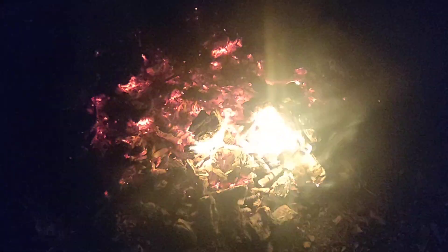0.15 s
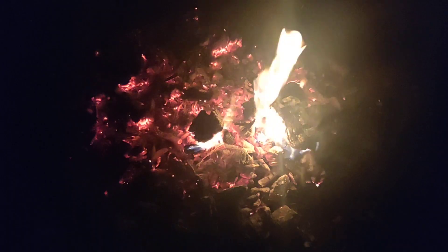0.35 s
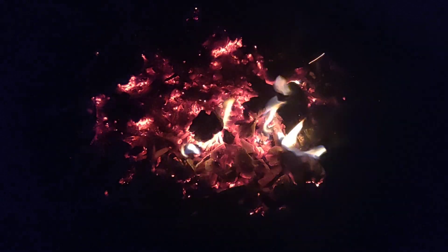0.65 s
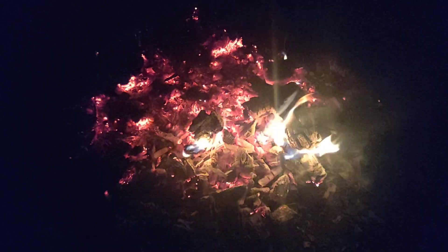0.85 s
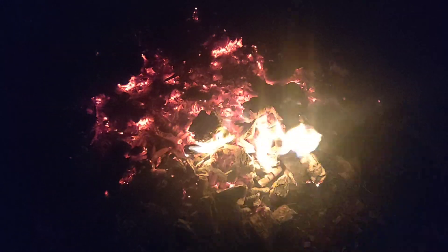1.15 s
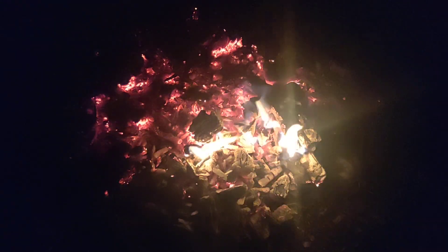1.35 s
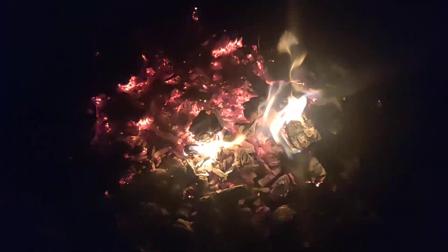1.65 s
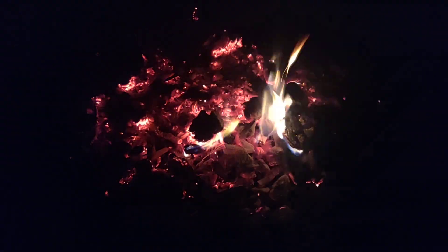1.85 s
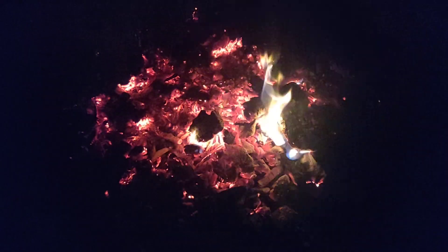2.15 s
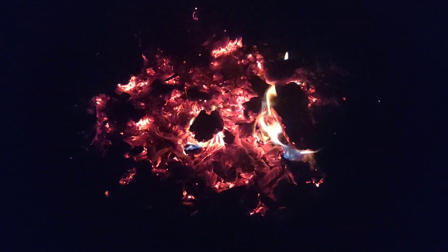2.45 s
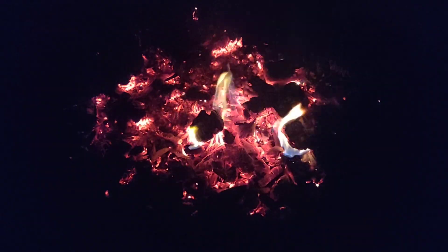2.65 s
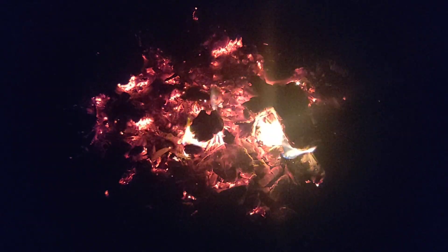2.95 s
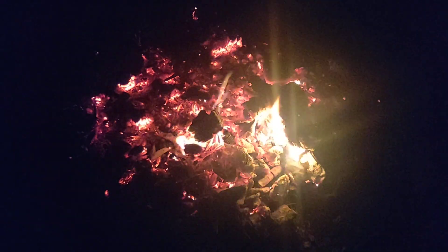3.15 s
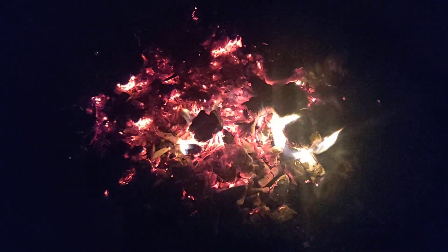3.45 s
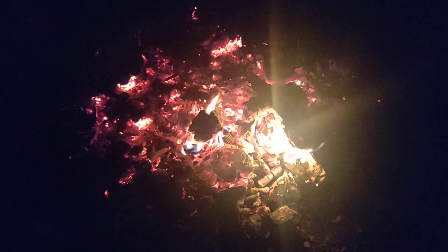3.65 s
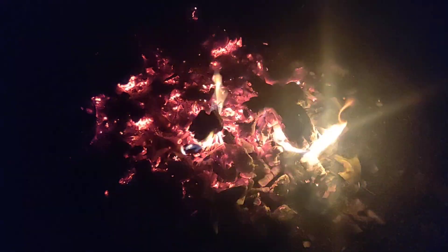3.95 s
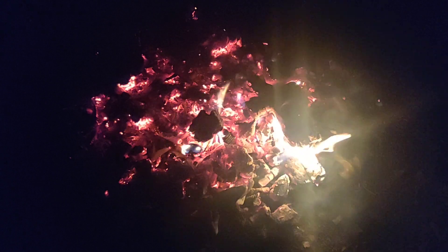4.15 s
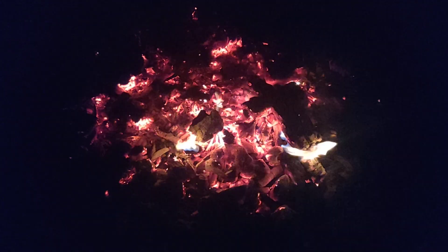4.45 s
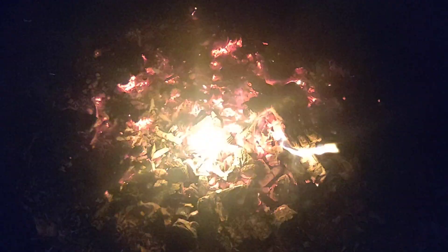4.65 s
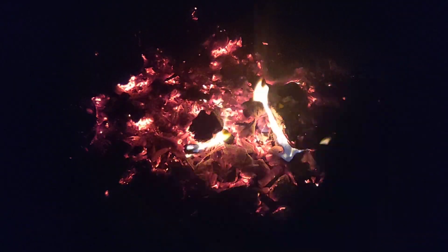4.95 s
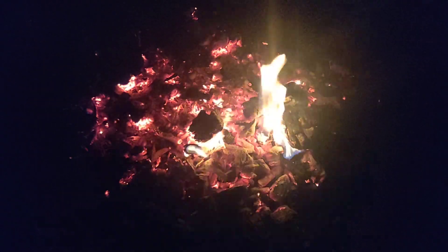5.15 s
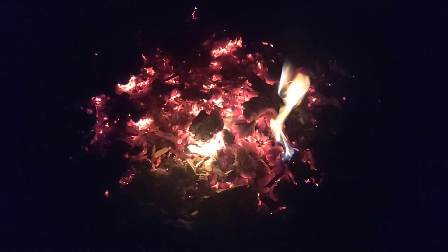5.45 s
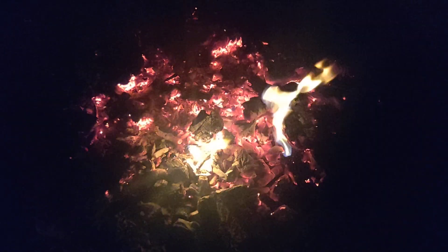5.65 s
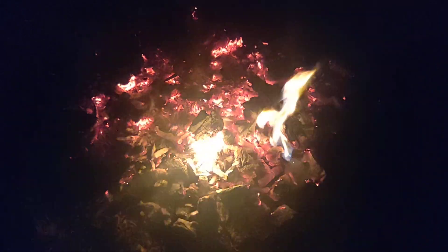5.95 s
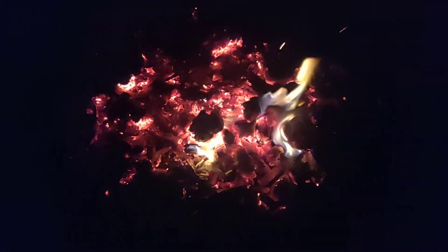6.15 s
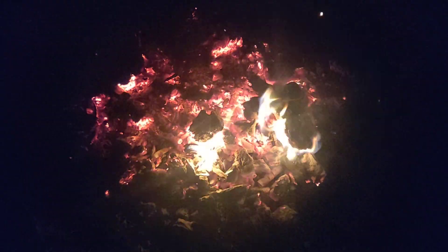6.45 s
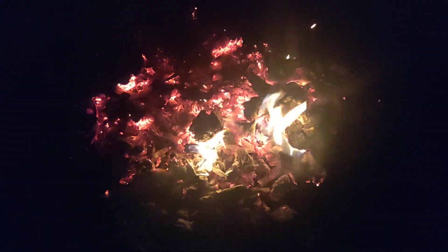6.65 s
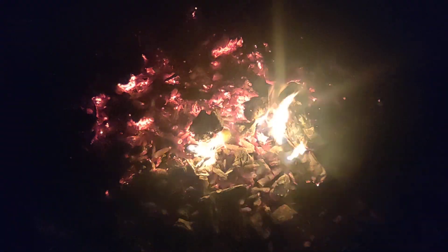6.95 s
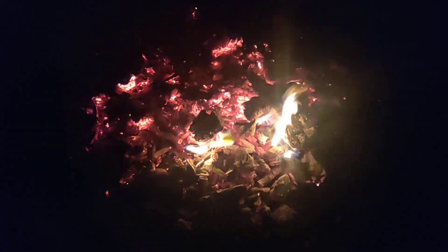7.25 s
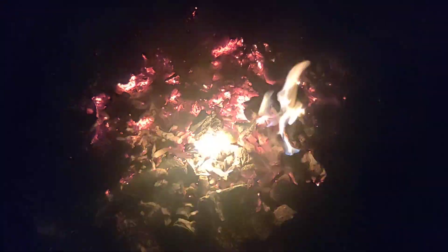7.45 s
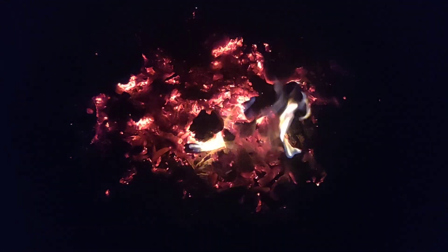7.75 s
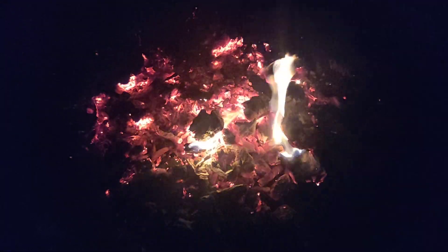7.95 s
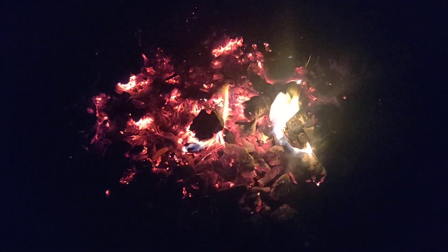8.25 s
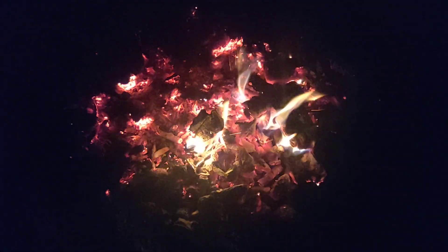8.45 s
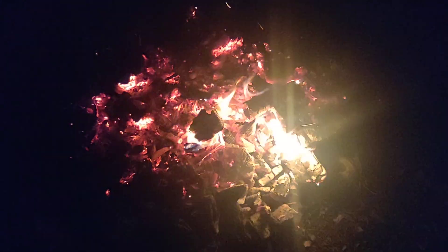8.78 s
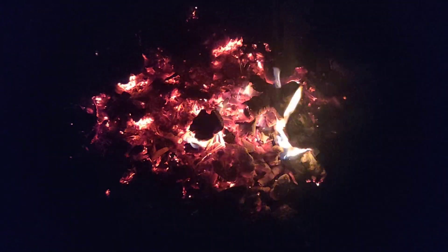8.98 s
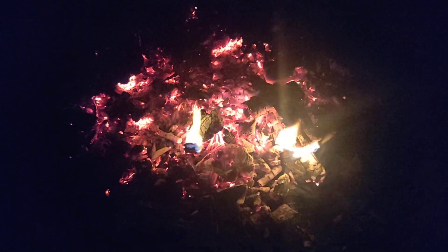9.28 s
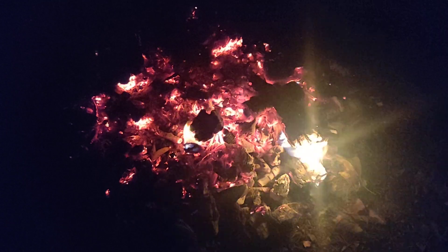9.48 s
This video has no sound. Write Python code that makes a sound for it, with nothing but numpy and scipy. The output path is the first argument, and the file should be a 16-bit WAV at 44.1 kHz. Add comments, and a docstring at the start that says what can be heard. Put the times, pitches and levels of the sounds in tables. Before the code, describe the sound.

Dry charcoal pops and soft fire rumble outdoors at night, then a bright cricket chirps rapidly nearby as far crickets trill and an engine drones faintly.

```python
"""Embers and crickets at night

A bed of embers ticks and pops close by: noise bursts through resonances, over a rumble of small flames.
Halfway through, a cricket starts chirping nearby, each wing stroke a downward-sliding tone with a faint rasp.
Other crickets trill further off, in a faint insect chorus made of pulsing tones and shaped noise.
A distant engine drones, a wavering note inside a low roar; later it comes and goes in level and sinks in pitch.
"""
import sys
import numpy as np
from scipy import signal
from scipy.fft import rfft, irfft, next_fast_len
from scipy.io import wavfile
from scipy.ndimage import uniform_filter1d, minimum_filter1d, map_coordinates

SR = 44100
rng = np.random.default_rng(int(sys.argv[2]) if len(sys.argv) > 2 else 0)


def unload_audio(sound):
    """Save the sound as a 16-bit wav file, at the path given as the first command line argument."""
    columns = np.transpose(np.atleast_2d(sound))
    # keep every value between -1 and 1, then stretch to whole-number steps
    steps = np.round(np.clip(columns, -1, 1) * 32767)
    wavfile.write(sys.argv[1], SR, steps.astype(np.int16))


N = 424241

# Flame rumble spectrum. Each row: frequency in Hz, relative level in dB per Hz.
FLAME_SPECTRUM = [(12, -33), (20, -1.5), (48, -0.5), (103, 0), (116, -1.5), (135, -8), (172, -12.5),
                  (243, -14), (321, -20.5), (356, -24), (420, -36), (550, -63), (920, -120)]
# Night air spectrum. Each row: frequency in Hz, relative level in dB per Hz.
AIR_SPECTRUM = [(250, 0), (420, -3), (600, 0.5), (950, -0.5), (1250, -8.5), (2000, -12), (2700, -12.5),
                (4500, -9.5), (5500, -13), (6700, -7.5), (8200, -19), (10000, -25.5), (15500, -21)]
# Blended insect spectrum. Each row: frequency in Hz, relative level in dB per Hz.
CHORUS_SPECTRUM = [(2500, -21), (3000, -5.5), (3300, 1.5), (3520, 0), (3800, -5.5), (4400, -8.5),
                   (5200, -56)]
# Engine roar spectrum. Each row: frequency in Hz, relative level in dB per Hz.
ROAR_SPECTRUM = [(50, -21.5), (80, 11.5), (125, -12), (175, -1.5), (220, 6), (310, -0.5), (400, -16),
                 (700, -49)]
# Stereo width of the noise beds. Each row: frequency in Hz, left-right correlation from -1 to 1.
STEREO_LIKENESS = [(60, 0.94), (130, 0.99), (290, 0.76), (640, 0.54), (1410, -0.18), (3100, 0.034),
                   (15000, -0.018)]
# Partials of the exhaust note. Each row: multiple of the note, level in dB before it wavers.
EXHAUST_ORDERS = [(.7, -8.5), (0.999, -1.5), (1.25, -14), (1.78, -21)]
# Engine loudness once it is within earshot. Each row: time in seconds, level in dB.
ENGINE_LEVEL_CURVE = [(4.5, -83), (5.01, -49.5), (5.35, -67), (6.27, -51), (6.95, -58), (7.94, -47.5),
                      (8.16, -57), (8.62, -44.5), (9.62, -45)]
# Far cricket trills. Each row: centre of first pulse in seconds, pulses, seconds between pulses,
# pitch in Hz before random detune, level in dB before random variation.
FAR_TRILLS = [(.012, 12, .044, 3120, -54.5), (2.2, 11, .05, 3490, -53), (4.35, 8, 0.045, 3690, -58),
              (8.226, 1, .052, 3550, -40), (8.39, 6, .0522, 3597, -38), (8.808, 4, 0.056, 3540, -42.5)]
# Loudness through one wing stroke, with a small catch at its end. Each row: share of the stroke, gain.
STROKE_SHAPE = [(0, 0.14), (.06, 0.33), (.18, 0.77), (.36, 0.78), (.58, 0.85), (.76, 0.35), (.87, 0.33),
                (.96, 0.2), (1, 0.031)]
# Louder bursting embers. Each row: start in seconds, level in dB (all the energy as rms over 10 ms),
# snap centre in Hz, low knock gain in dB, scatter tail gain in dB, left minus right level in dB.
LOUD_POPS = [(.3544, -28.5, 5570, -8, -6.5, -1), (0.4698, -48.5, 5340, -8, 16, 1),
             (0.9092, -34, 3460, 3.5, -2, 3), (1.063, -40, 4480, -24, 12, 3),
             (1.0832, -40, 4770, -26, 4, 1), (1.1092, -43, 4000, -28, -2, 3),
             (1.155, -28, 4550, -35, -10, 2.5), (1.355, -36.5, 5600, -15, 18, 1.5),
             (2.276, -48, 6200, -8, -1, 1), (2.4406, -47, 4370, -6, -12, 2),
             (2.6062, -45, 4750, -12, 14, 8), (3.0366, -44.5, 7200, -31, -19, 15),
             (3.108, -24.5, 3100, -10, -12, 3.5), (3.6762, -31.5, 5350, -8, 1.5, 6),
             (3.8453, -41, 4650, -1, -8, 0), (4.085, -46.5, 3600, 10, 3, 6),
             (4.1879, -34.5, 4260, -8, -10, 3), (4.9831, -43, 4930, -27, 7, 4),
             (5.7008, -36, 4300, 4.5, -8, 5), (6.0168, -44, 3200, -3, -6, 3),
             (7.1605, -48.5, 5900, -18, -3, 2), (7.2019, -48.5, 4530, -7, -3, 8.5),
             (7.5157, -41.5, 5540, -3, 9, 1), (7.7187, -17, 3560, -4.5, 1.5, 2),
             (8.308, -46.5, 5700, -5, 4, 9.5), (8.6014, -42, 4300, -18, 6, -2),
             (8.7041, -17, 4900, -8.5, -6.5, 2.5), (9.0752, -40, 5040, -15, -17, 12.5),
             (9.3525, -12.5, 4600, -6.5, -13.5, 1.5), (9.4875, -46.5, 3760, -10, -18, 5)]
# Colour shared by all pops. Each row: frequency in Hz, gain in dB.
EMBER_COLOUR = [(200, -37), (400, -9), (520, 0), (750, -6), (1100, 0.5), (1800, -0.5), (3200, 4.5),
                (4400, 1.5), (5400, -2), (6700, 3), (8600, -1.5), (10000, -15), (16000, -13.5)]
# Near cricket chirps. Each row: approximate time of first stroke in seconds, strokes.
NEAR_CHIRPS = [(4.665, 8), (5.045, 8), (5.407, 8), (5.773, 8), (6.139, 8), (6.528, 8), (6.892, 8),
               (7.272, 7), (7.638, 8), (8.027, 8), (8.437, 8), (8.854, 7), (9.245, 7)]

FLAME_DB, FLAME_GROWTH_DB_PER_S = -44, 0.26  # starting level; the flames slowly gain strength
AIR_DB, AIR_GROWTH_DB_PER_S = -57, 0.2224  # starting level; the air slowly rises too
CHORUS_DB = -59.5  # blended distant insects
ENGINE_HZ, ENGINE_SAG_HZ_PER_S = 282.8, 8.1  # starting note, and its sinking after arrival
ENGINE_ARRIVES_S, ENGINE_FAR_DB = 4.5, -69  # held at the far level until it arrives
BUSY_FROM_S, BUSY_UNTIL_S = 2.25, 4.55  # the coals crackle more busily between these times
STROKE_PERIOD_S, SONG_HZ, SONG_DB = .0269, 2999, -21.5  # the near cricket in full song
WARM_UP_S, COLD_DB, COLD_HZ = 1.7, 4.5, 50  # it starts this much softer and lower, and warms up
FIRST_STROKE_DB, HESITANT_DB = 4, 13  # each chirp opens weaker; the very first one weaker still
TOP_HZ = 16000  # upper band limit


def amp(db):
    """Decibels to gain."""
    return 10 ** (np.asarray(db) / 20)


def unit(x):
    """Scale to rms 1."""
    return x / np.sqrt(np.mean(x ** 2) + 1e-20)


def along(points, hz):
    """Read (Hz, value) points on a log frequency axis."""
    f, v = np.transpose(points)
    return np.interp(np.log(hz + 1), np.log(f + 1), v)


def curves(rows):
    """One value per sample for each column after the time."""
    s, *cols = np.transpose(rows)
    return [np.interp(np.arange(N) / SR, s, c) for c in cols]


def wobble(rate):
    """A smooth random curve with rate knots a second."""
    knots = rng.standard_normal(int(N * rate / SR) + 4)
    steps = np.linspace(0, N, len(knots) * 10)
    return np.interp(np.arange(N), steps, map_coordinates(knots, [steps * rate / SR]))


def filtered(x, response):
    """Shape x with a complex response of frequency."""
    n = x.shape[-1]
    m = next_fast_len(n + 4096)  # padding leaves room for ringing
    return irfft(rfft(x, m) * response(np.fft.rfftfreq(m, 1 / SR)), m)[..., :n]


def causal(gain):
    """The minimum-phase response of this gain, which rings only after it is struck."""
    cepstrum = irfft(np.log(np.maximum(gain, 1e-6)))
    half = len(cepstrum) // 2
    return np.exp(rfft(np.r_[cepstrum[0], 2 * cepstrum[1:half], np.zeros(half)]))


def resonance(hz, centre, q):
    """Gain of one resonance, 1 at its centre."""
    return 1 / np.sqrt(1 + (q * ((hz + 1) / centre - centre / (hz + 1))) ** 2)


def delay(hz, left_s, right_s):
    """Stereo phase response that delays each side by its own time."""
    return np.exp(-2j * np.pi * hz * np.array([[left_s], [right_s]]))


def pan(db):
    """Left and right gains for a left minus right level difference."""
    return amp([[db / 2], [-db / 2]])


def add(track, s, sound):
    """Mix a sound into a track from time s."""
    i = int(np.clip(round(s * SR), 0, N - 1))
    track[..., i:i + sound.shape[-1]] += sound[..., :N - i]


def rush(spectrum, patchy_db):
    """Diffuse stereo noise of rms 1 with random patches of gain in time and frequency."""
    z = signal.stft(rng.standard_normal((2, N)), nperseg=512)[2]
    field = uniform_filter1d(rng.standard_normal(z.shape[1:]), size=5, axis=0)
    field = uniform_filter1d(field, size=14, axis=1)
    pair = signal.istft(z * amp(patchy_db * unit(field)), nperseg=512)[1][:, :N]

    def mid_side_gain(hz):
        # the mid-side balance sets the left-right correlation
        turn = np.arccos(np.clip(along(STEREO_LIKENESS, hz), -1, 1)) / 2
        return amp(along(spectrum, hz)) * np.array([np.cos(turn), np.sin(turn)])

    mid, side = filtered(pair, mid_side_gain)
    return unit(np.array([mid + side, mid - side]))


def night():
    """Flickering flames rumble over night air and the blended shimmer of insects, all as shaped noise."""
    t = np.arange(N) / SR
    flame_db = FLAME_DB + FLAME_GROWTH_DB_PER_S * t + .3 * wobble(1.975) + 0.9 * wobble(8)
    flames = amp(flame_db) * rush(FLAME_SPECTRUM, patchy_db=0.35)
    air = amp(AIR_DB + AIR_GROWTH_DB_PER_S * t) * rush(AIR_SPECTRUM, patchy_db=1.5)
    chorus = amp(CHORUS_DB + 0.85 * wobble(35)) * rush(CHORUS_SPECTRUM, patchy_db=0.8)
    return pan(2.26) * flames + pan(1.07) * air + pan(3.0) * chorus


def engine(tone_db=-2.0, roar_db=0):
    """A wavering exhaust note with neighbouring orders, in a low roar; it later sinks in pitch."""
    since = np.arange(N) / SR - ENGINE_ARRIVES_S
    hz = ENGINE_HZ - ENGINE_SAG_HZ_PER_S * np.maximum(since, 0)
    db = np.where(since < 0, ENGINE_FAR_DB, curves(ENGINE_LEVEL_CURVE)[0])
    phase = 2 * np.pi * np.cumsum(hz * (1 + .008 * wobble(14))) / SR
    note = np.zeros(N)
    for order, order_db in EXHAUST_ORDERS:
        note += amp(order_db + 2 * wobble(7)) * unit(np.sin(order * phase))
    roar = rush(ROAR_SPECTRUM, patchy_db=2.5)
    return pan(1.9) * amp(db) * (amp(tone_db) * note + amp(roar_db) * roar)


def outdoors(x, t60):
    """Diffuse stereo echo from grass and bushes: a noise tail that builds fast and decays."""
    t = np.arange(SR // 2) / SR
    tail = rng.standard_normal((2, len(t))) * amp(-60 * t / t60) * (1 - np.exp(-t / 0.0029))
    return signal.fftconvolve(x[None], tail / np.linalg.norm(tail[0]), axes=1)[:, :N]


def meadow(meadow_db=-63.5, count=6):
    """Crickets far across the grass: each pulses on its own pitch, fading in and out."""
    song = np.zeros(N)
    for pitch_hz in np.linspace(3250, 3560, count):
        u = np.cumsum(20 + 1.3 * wobble(0.97)) / SR % 1  # place within the wing cycle
        bend = 1 + 0.0856 * (.5 - u) + .008 * wobble(2)  # downward slide and slow drift
        phase = 2 * np.pi * np.cumsum(pitch_hz * bend) / SR
        song += amp(2.5 * wobble(1.5)) * np.sin(np.pi * u) ** 4 * np.sin(phase)
    return amp(meadow_db) * pan(1.2) * unit(outdoors(song, t60=0.044))


def wing_stroke(pitch_hz, length, fall, overtone_db, slip=0.005):
    """One wing closing: the file slows so the tone slides down; its teeth catch unevenly near the end."""
    u = np.linspace(0, 1, int(length * SR))
    teeth = unit(uniform_filter1d(rng.standard_normal(len(u)), size=45)) * (1.1 + u ** 3)
    hz = pitch_hz * (1 + fall * (.33 - u ** 1.38) + slip * teeth)
    phase = 2 * np.pi * (np.cumsum(hz) / SR + rng.random())
    overtones = np.sin(2 * phase) + 0.78 * np.sin(3 * phase)
    tone = np.sin(phase) + amp(overtone_db) * overtones
    swell = uniform_filter1d(np.interp(u, *np.transpose(STROKE_SHAPE)), size=70, mode='constant')
    return swell * tone


def far_crickets(length=.024, direct_db=0, echo_db=-8):
    """Slower trills of single wing strokes, blurred by distance with an outdoor echo."""
    song = np.zeros(N)
    for s, pulses, period, pitch_hz, db in FAR_TRILLS:
        for k in range(round(pulses)):
            pulse_hz = pitch_hz * (1 + 0.0029 * rng.standard_normal())
            stroke = wing_stroke(pulse_hz, length, fall=0.049, overtone_db=-43)
            level = amp(db + 2.6 * rng.standard_normal())
            add(song, s + k * period - length / 2, level * stroke)
    return amp(direct_db) * song + amp(echo_db) * outdoors(song, t60=0.11)


def noise_burst(t, t60, spiky_db):
    """Decaying stereo noise of rms 1; a random gain on every sample makes it spiky."""
    envelope = amp(spiky_db * rng.standard_normal(len(t)) - 60 * t / t60)
    return unit(rng.standard_normal((2, len(t))) * envelope)


def pop(db, snap_hz, knock_db, tail_db, pan_db, crack_t60=0.0086, tail_t60=0.031,
        ground_db=-29, ground_t60=0.74, left_lead=.00003):
    """A gas pocket bursts: a sharp push, a tearing crack, spiky scatter from the coals, a ground echo."""
    t = np.arange(SR // 10) / SR
    push = unit(1. * (t == 0))
    crack = noise_burst(t, crack_t60, spiky_db=0)
    scatter = noise_burst(t, tail_t60, spiky_db=9)
    ground = noise_burst(t, ground_t60, spiky_db=0)
    blast = 0.62 * push + 0.63 * crack + amp(tail_db) * scatter + amp(ground_db) * ground

    def response(hz):
        snap = 0.62 * resonance(hz, snap_hz, 0.91) ** 2
        knock = amp(knock_db) * resonance(hz, 700, 1.0)
        colour = amp(along(EMBER_COLOUR, hz)) * np.hypot(snap, knock)
        return causal(colour) * delay(hz, 0, left_lead)

    sound = filtered(blast, response)
    return amp(db) * pan(pan_db) * unit(sound) / np.sqrt(10)  # refers the 100 ms rms to 10 ms


def tick(db, spread_db=5.0):
    """A small crack in the charcoal, of random size, colour and place; bigger ones knock more."""
    size, pitch, scatter, place = rng.random(4)
    bigger_db = min(-spread_db * np.log(size), 9)
    return pop(db + bigger_db, 4500 + 2500 * pitch, bigger_db - 22.5, 12 * scatter - 7, 11 * place)


def embers(quiet_db=-64, busy_db=-57):
    """Loud pops as pockets burst, faint charcoal ticks throughout, and a spell of livelier ticks."""
    out = np.zeros((2, N))
    for s, db, snap_hz, knock_db, tail_db, pan_db in LOUD_POPS:
        add(out, s, pop(db, snap_hz, knock_db, tail_db, pan_db))
    for s in rng.uniform(0, N / SR, size=60):
        add(out, s, tick(quiet_db))
    for s in rng.uniform(BUSY_FROM_S, BUSY_UNTIL_S, size=16):
        add(out, s, tick(busy_db))
    return out


def wing_rasp(hz):
    """Three wing resonances that colour the scrape of the file's teeth."""
    low = resonance(hz, 4230, 4.6) ** 2
    middle = 1.36 * resonance(hz, 5910, 6.9) ** 2
    high = 0.33 * resonance(hz, 9170, 10.0) ** 2
    return low + middle + high


def near_cricket(length=.0205, rasp_db=-16.0, echo_db=-22, left_lag=.00004):
    """Chirps of seven or eight strokes, the first weaker and shorter; the file's teeth add a faint rasp."""
    song, start = np.zeros(N), NEAR_CHIRPS[0][0]
    for s, strokes in NEAR_CHIRPS:
        cold = np.exp((start - s) / WARM_UP_S)  # 1 at the first chirp, fading as it warms up
        soft_db = FIRST_STROKE_DB + HESITANT_DB * (s == start)
        for k in range(round(strokes)):
            early, longer, sharper, louder, steeper = rng.standard_normal(5)
            effort = amp(.7 * louder - soft_db * np.exp(-k / 1.6))
            span = length * effort ** 0.27 * (1 + .06 * longer)
            pitch_hz = (SONG_HZ - COLD_HZ * cold) * (1 + 0.0064 * sharper)
            stroke = wing_stroke(pitch_hz, span, fall=0.18 * (1 + 0.11 * steeper), overtone_db=-33.0)
            stroke_s = s + k * STROKE_PERIOD_S - 0.27 * span + .0003 * early
            add(song, stroke_s, amp(SONG_DB - COLD_DB * cold) * effort * stroke)
    rasp = filtered(np.abs(song) * rng.standard_normal((2, N)), wing_rasp)
    direct = filtered(song, lambda hz: delay(hz, left_lag, 0))
    return pan(-2.1) * direct + amp(rasp_db) * rasp + amp(echo_db) * outdoors(song, t60=0.19)


def scene():
    """The fire in front, the insects and the engine around it."""
    return night() + engine() + meadow() + far_crickets() + embers() + near_cricket()


def record(dry):
    """A fast limiter holds peaks to about 0.9 of full scale, then a steep low-pass sets the band limit."""
    needed = np.minimum(1, .9 / (np.abs(dry).max(axis=0) + 1e-9))
    gain = uniform_filter1d(minimum_filter1d(needed, size=31), size=31)
    return filtered(dry * gain, lambda hz: 1 / np.sqrt(1 + (hz / TOP_HZ) ** 120))


dry = scene()
out = record(dry)
unload_audio(out)
```